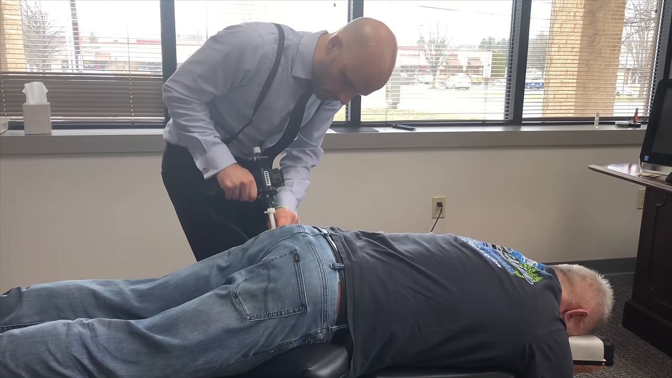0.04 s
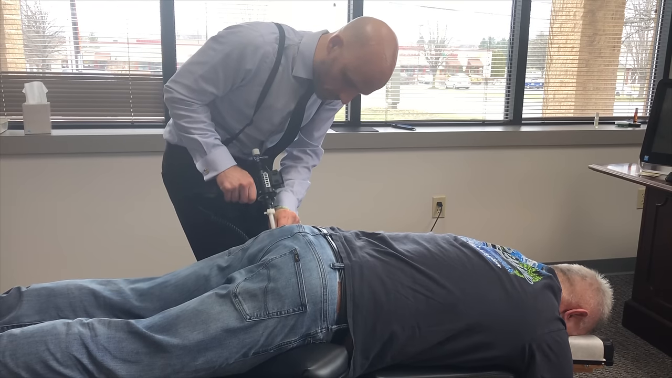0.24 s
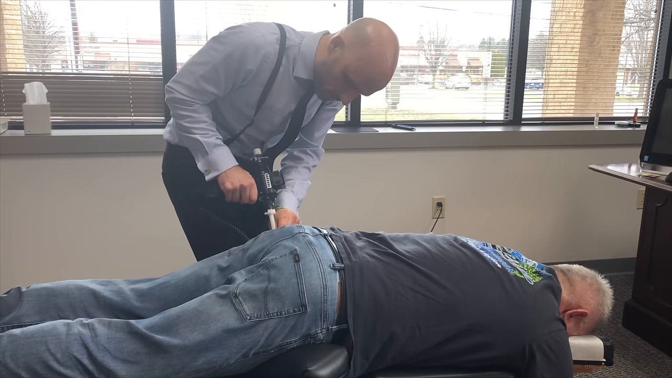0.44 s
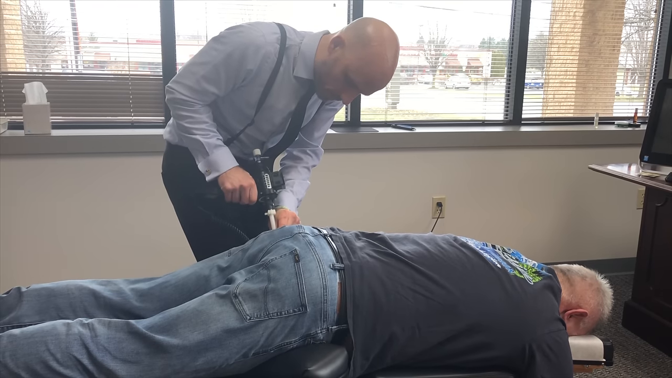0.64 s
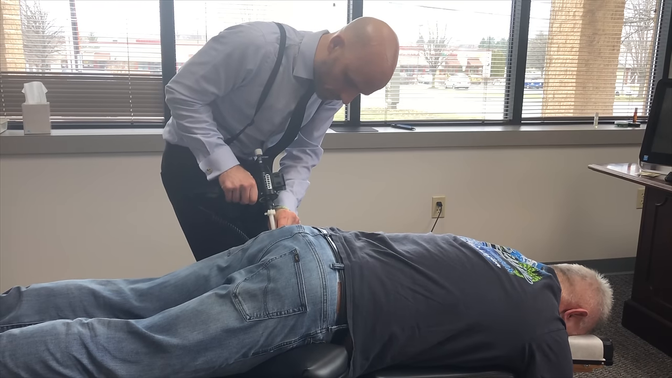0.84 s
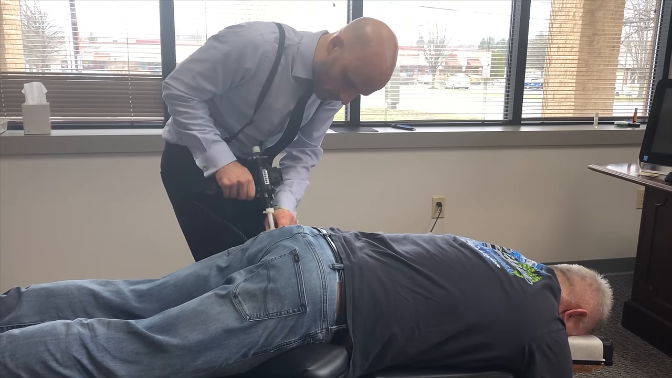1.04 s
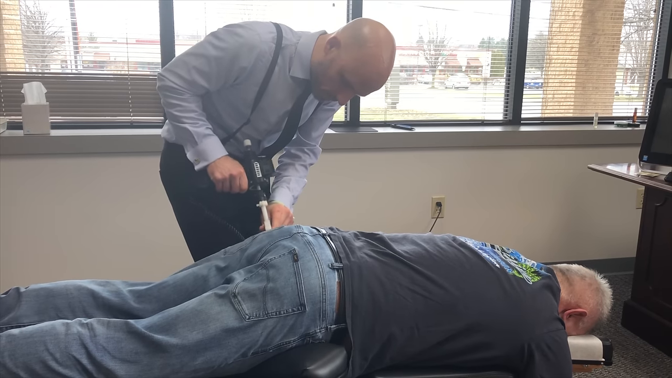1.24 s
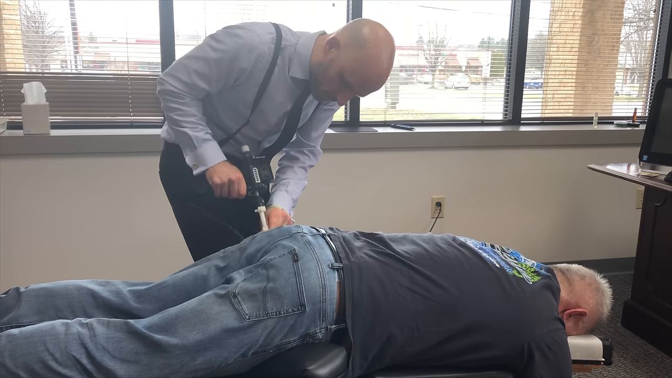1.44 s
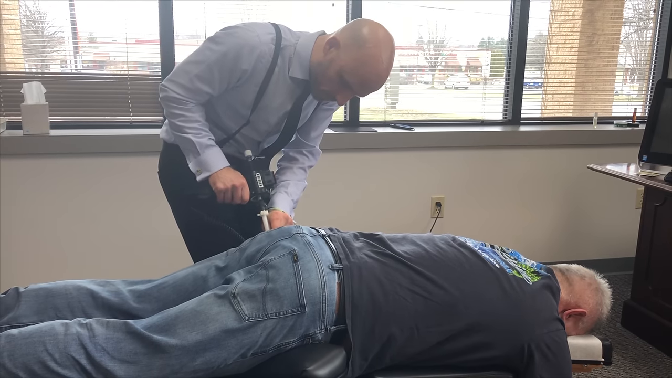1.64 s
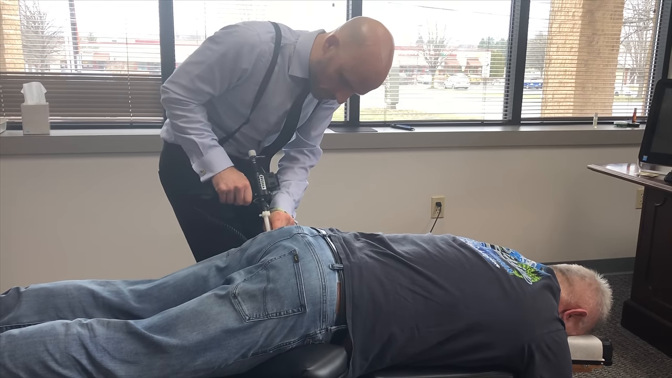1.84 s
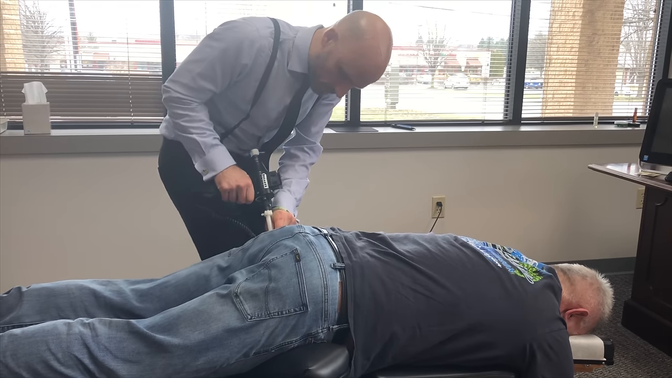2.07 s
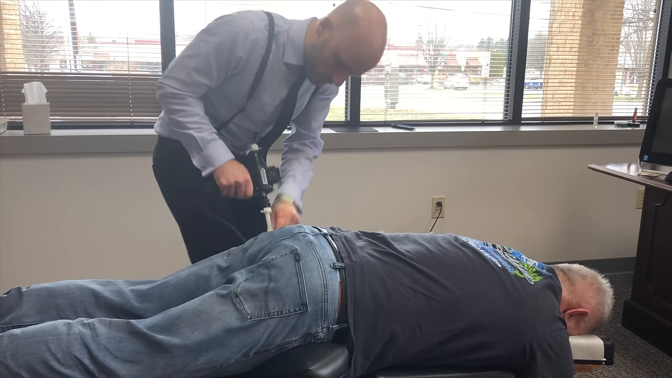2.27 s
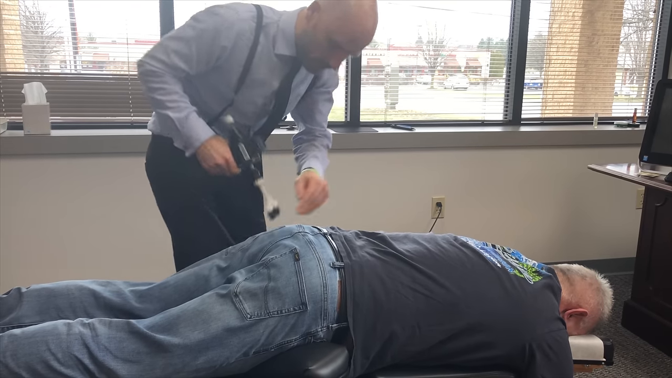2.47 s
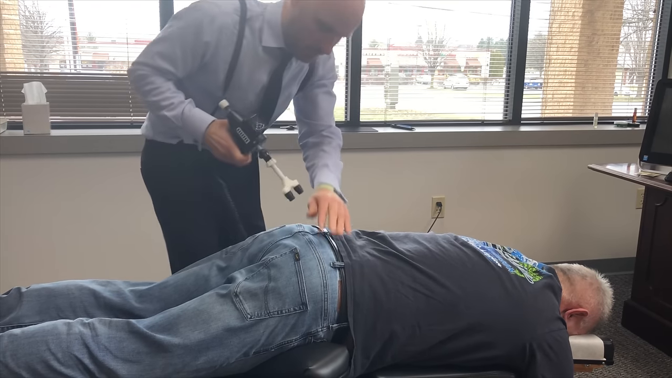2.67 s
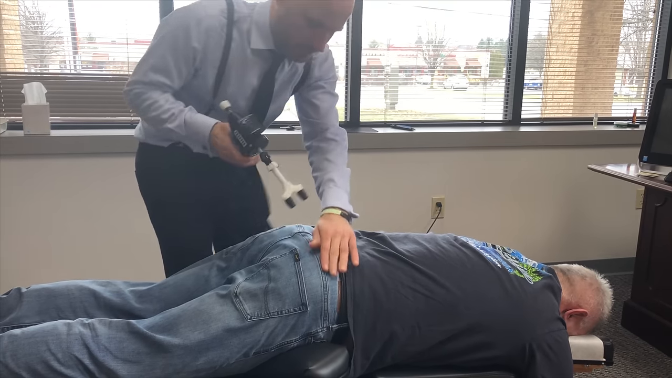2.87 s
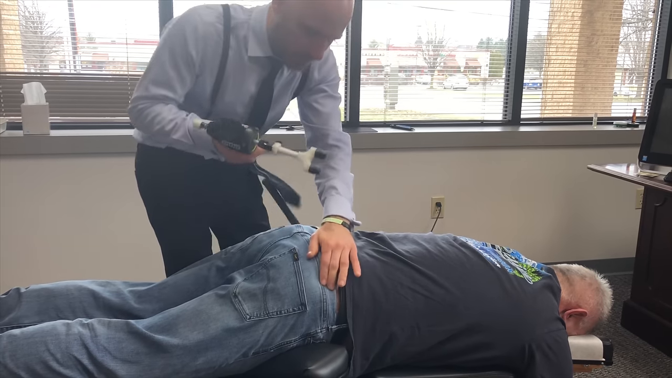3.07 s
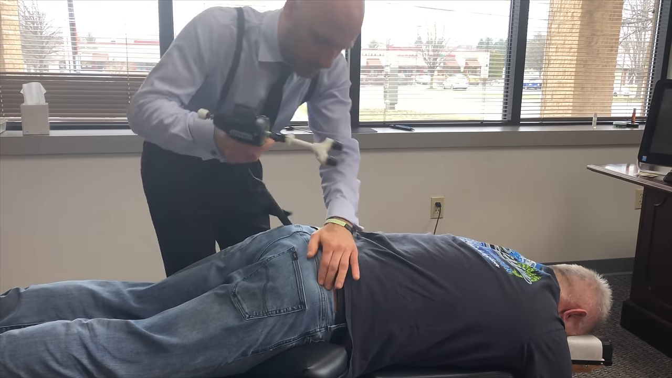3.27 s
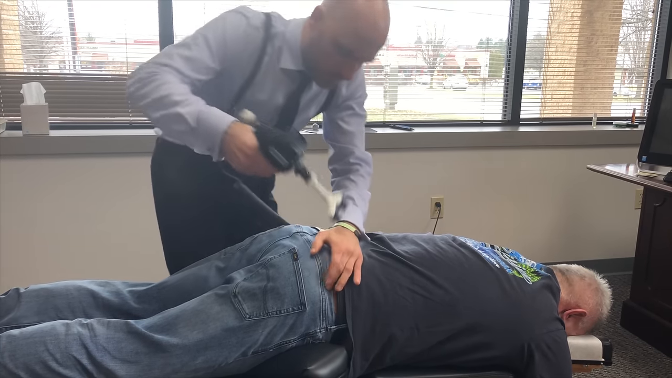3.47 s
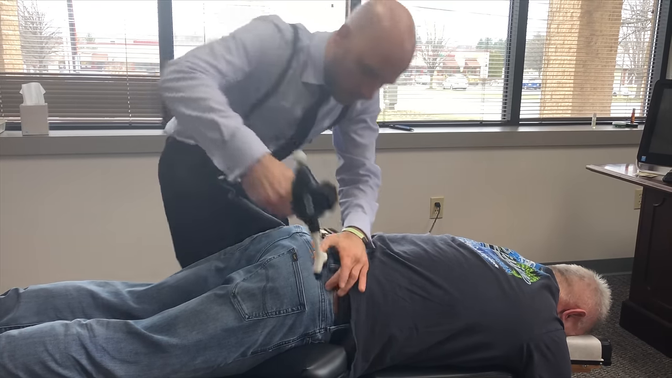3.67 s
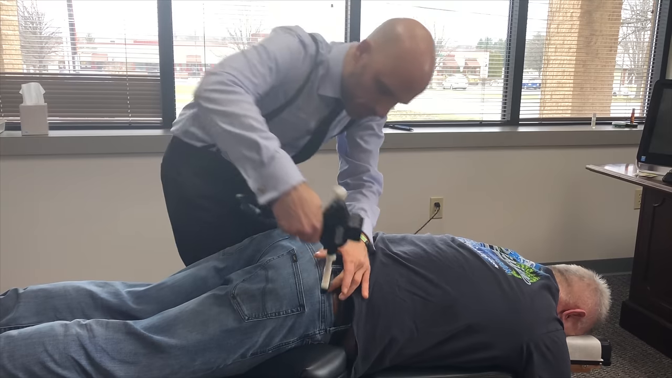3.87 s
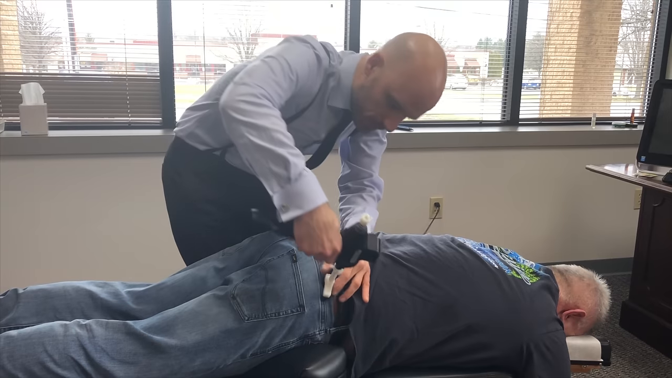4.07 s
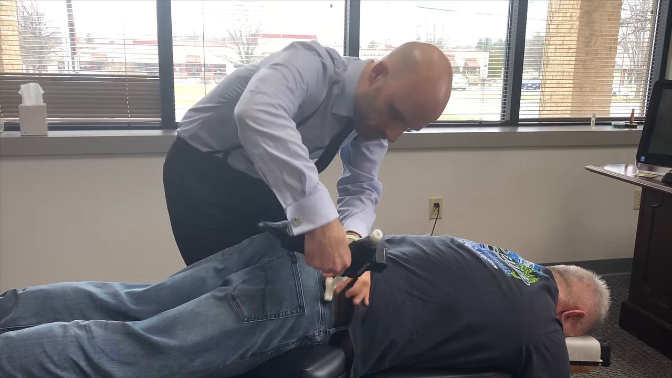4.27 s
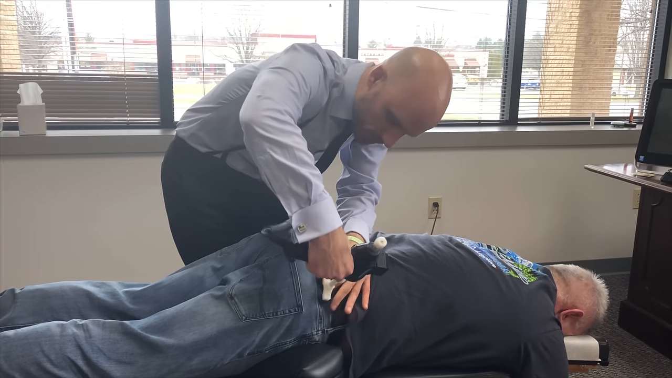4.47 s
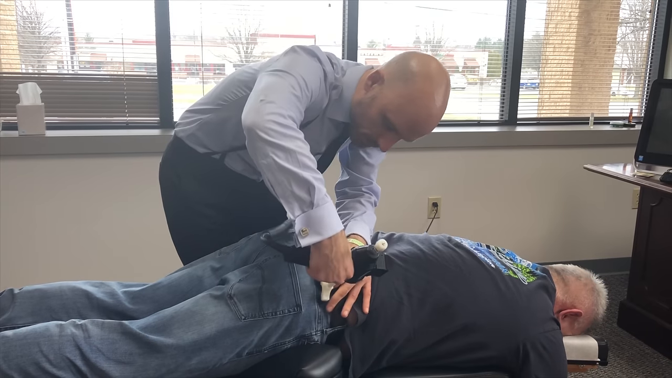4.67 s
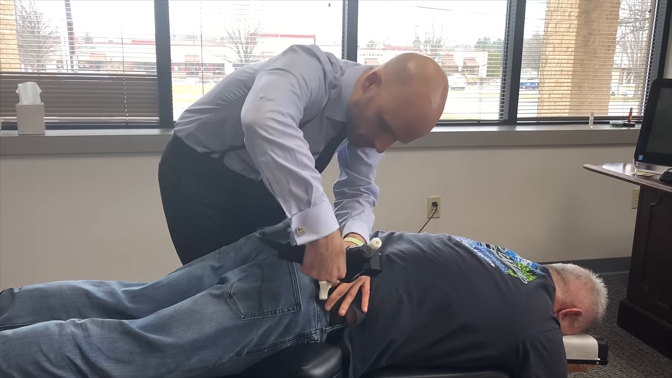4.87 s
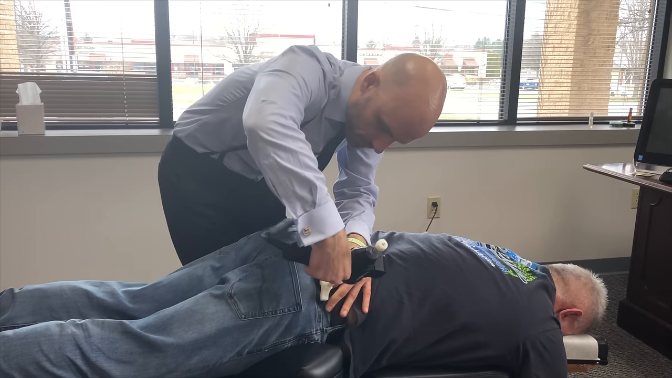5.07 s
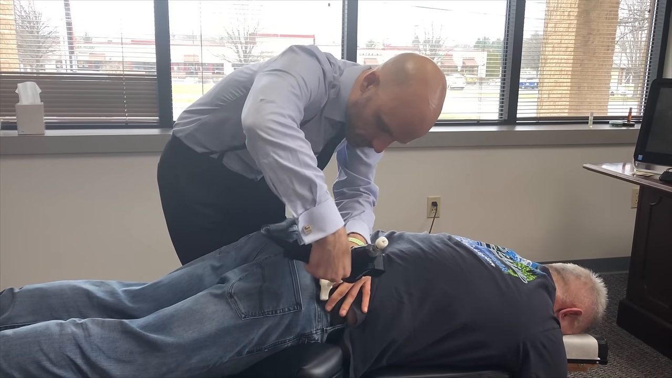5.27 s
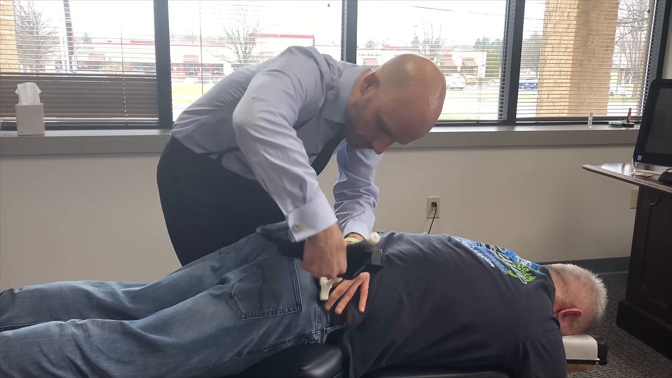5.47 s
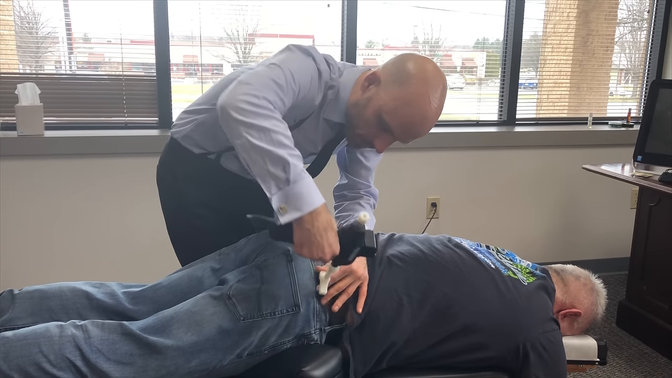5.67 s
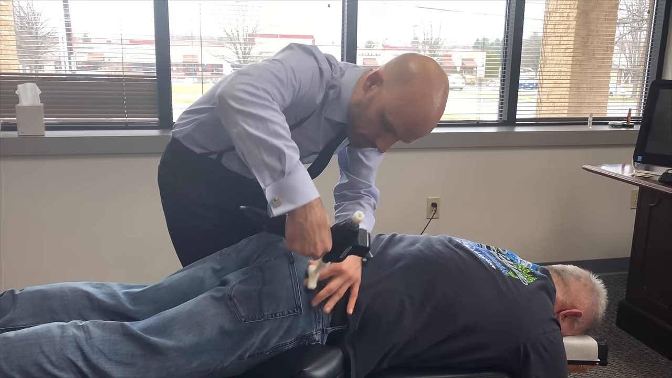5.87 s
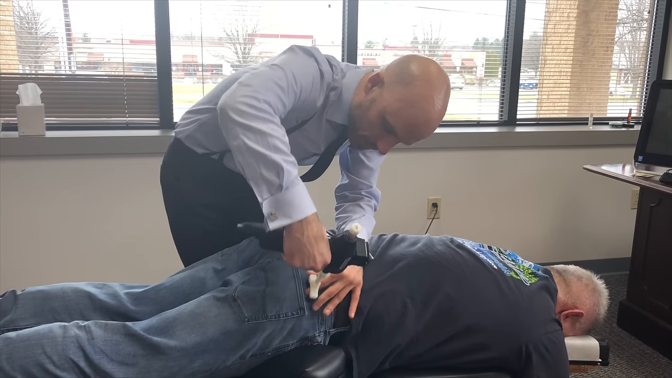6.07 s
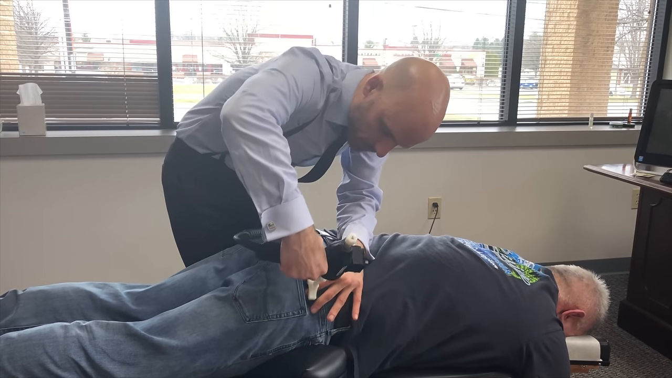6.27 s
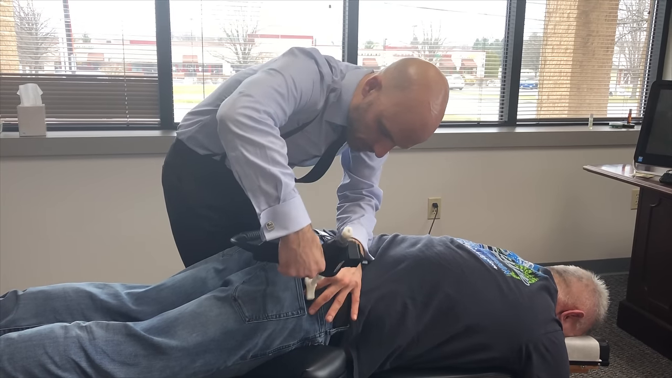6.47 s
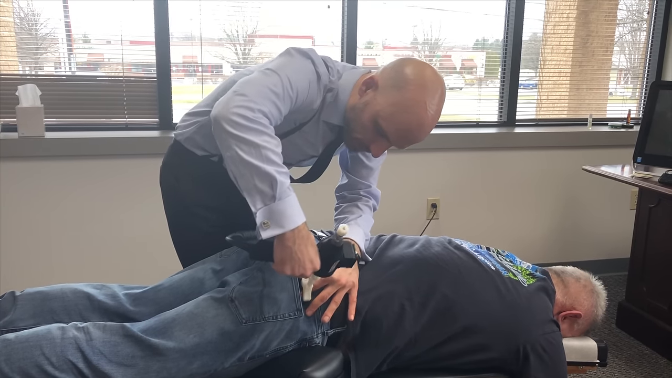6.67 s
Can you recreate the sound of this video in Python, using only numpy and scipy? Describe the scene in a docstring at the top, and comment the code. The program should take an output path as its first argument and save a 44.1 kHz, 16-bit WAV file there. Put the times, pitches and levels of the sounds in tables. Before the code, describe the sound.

A quick machine-like tick-tick-tick, about twelve a second, each a spring rattle, snap and small hollow ring, with occasional harder clacks. Midway it ceases for over a second of quiet handling: a sharp plastic click, dull soft thumps, brushing fabric. The second burst is stronger, with a run of bright steel hammering, then uneven emphasis. Ventilation rumbles softly throughout; a single microphone hears the small, lively room.

```python
"""A spring-driven adjusting instrument cycles twelve times a second against a person's back, in a small room.
Every cycle ticks: the spring rattles, a catch snaps and a hollow grip rings. When the hammer catches, shaped
noise bursts make steel chatter on steel, and ringing modes make the housing knock. Midway it is lifted and
set down again: clicks, padded bumps and scuffed cloth, then different echoes. Filtered noise makes the
motor's gears and hum, and the ventilation that rumbles throughout. One microphone hears it, cut near 16 kHz."""
import sys
import numpy as np
from scipy import signal
from scipy.fft import rfft, irfft, next_fast_len
from scipy.io import wavfile

SR = 44100
rng = np.random.default_rng(int(sys.argv[2]) if len(sys.argv) > 2 else 0)


def dump(signal):
    """Clip the signal to [-1, 1] and save it as 16-bit WAV at the path in sys.argv[1]."""
    limited = np.clip(np.atleast_2d(signal).T, -1, 1)
    pcm = np.round(limited * 32767).astype(np.int16)
    wavfile.write(sys.argv[1], SR, pcm)


N = 295911
LEAD = SR // 10   # samples kept ahead of time zero, for sounds that begin before it
LENGTH = 4096   # samples in a short sound
CYCLES_PER_S = 12
FIRM_RATTLE_DB = -57   # spring rattle under a firm hand; slack is counted in dB below it

# relative spectrum of the spring's rattle: (frequency [Hz], density [dB])
SPRING_SPECTRUM = [(1500, -24), (3500, 11), (5800, 6.5), (8000, 3), (10000, -2), (13000, -4), (16000, -7)]
# the two holds of the trigger: (first cycle [s], release [s], spring loading time without slack [s],
# and against the rattle: snap [dB], thin zing [dB], gear whirr [dB])
TRIGGER_HOLDS = [(-0.0114, 2.50, .007, 3, 3.8, -3), (3.7351, 6.70, .0042, -1, -9.5, -5.5)]


def from_db(db):
    """Decibels to gain."""
    return 10 ** (np.asarray(db) / 20)


def at_hz(points, hz):
    """Read a table on a log-frequency axis."""
    f, value = np.transpose(points)
    return np.interp(np.log(np.maximum(hz, 1)), np.log(f), value)


def tilted(spectrum, tilt_db):
    """The same spectrum, brighter or duller by so many dB per octave."""
    return [(hz, db + tilt_db * np.log2(hz)) for hz, db in spectrum]


def colour(x, spectrum):
    """Causal (minimum-phase) filter of the given spectrum, with unit gain for white noise."""
    size = next_fast_len((len(x) + LENGTH // 2) // 2, real=True) * 2
    hz = np.arange(size // 2 + 1) * SR / size
    cepstrum = irfft(np.log(from_db(at_hz(spectrum, hz))))
    # folding the cepstrum forward in time gives minimum phase
    cepstrum[1:size // 2] *= 2
    cepstrum[size // 2 + 1:] = 0
    response = np.exp(rfft(cepstrum))
    gain = np.sqrt(np.mean(abs(response) ** 2))
    return irfft(rfft(x, size) * response / gain)[:len(x)]


def sized(x, db):
    """Scale a short sound to the energy of 10 ms at this level."""
    energy = np.sum(x ** 2) + 1e-20
    return x * from_db(db) * np.sqrt(SR / 10 ** 2 / energy)


def add(track, s, sound):
    """Mix a short sound into a track at this time in seconds."""
    start = max(round(s * SR) + LEAD, 0)
    part = track[start:start + len(sound)]
    part += sound[:len(part)]


def chatter(rise_s, decay_s):
    """A flurry of tiny contacts that swells and dies within milliseconds, its spectrum partly evened out."""
    t = np.arange(LENGTH) / SR
    swell = (1 - np.exp(-t / rise_s)) ** 2 * np.exp(-t / decay_s)
    flurry = rng.standard_normal(LENGTH) * swell
    span = np.minimum(6 * swell / swell.max(), 1)
    for _ in range(3):
        spectrum = rfft(flurry)
        # exponent: 0 = lumpy spectrum, 1 = flat
        flurry = span * irfft(spectrum / (abs(spectrum) + 1e-12) ** 0.81)
    return flurry


def struck(modes, spread_db, rough, contact_s, detune=0):
    """One blow and its after-contacts ring decaying modes, whose strengths and pitches vary at random."""
    t = np.arange(LENGTH) / SR
    hz, db, t60 = np.transpose(modes)[:, :, None]
    hz = hz * np.exp(detune * rng.standard_normal(hz.shape))
    strength = from_db(db + spread_db * rng.standard_normal(hz.shape))
    strength = strength * rng.choice([-1, 1], hz.shape)
    ring = np.sum(strength * from_db(-60 * t / t60) * np.sin(2 * np.pi * hz * t), axis=0)
    force = chatter(contact_s / 10, contact_s)
    force *= rough / np.linalg.norm(force)
    force[0] += 1   # the blow itself
    return signal.fftconvolve(force, ring)[:LENGTH]


def effort(s):
    """Levels of catch, grip and spring rattle at these times, as the hand leans on the instrument and eases off."""
    # (time [s], catch [dB], hollow grip [dB], spring rattle [dB])
    hand_levels = [(.15, -54.3, -52.8, -62), (1.08, -52, -53, -60.5), (1.24, -58.5, -59.5, -70),
                   (1.49, -58, -59, -74), (1.75, -53.5, -51.5, -63.5), (2.33, -53.3, -52, -65),
                   (2.49, -57, -57, -76), (3.73, -51, -50.5, -65), (4.05, -50.5, -57, -73),
                   (4.75, -49, -49.5, -58.5), (5.1, -45.5, -41.7, -52), (5.5, -48.5, -45.5, -56.5),
                   (5.85, -49.5, -53.5, -69), (5.99, -51.5, -55, -74), (6.15, -46.5, -51, -55),
                   (6.48, -48, -50, -57), (6.66, -45.5, -49, -53)]
    when, *columns = np.transpose(hand_levels)
    return [np.interp(s, when, column) for column in columns]


def ventilation():
    """Air from the vents is filtered noise, its low rumble wandering in level."""
    # relative spectrum: (frequency [Hz], density [dB])
    air_spectrum = [(20, -42), (32, -29), (45, -5.5), (62, 0), (115, 1.5), (190, -3.5), (250, -6.5),
                    (350, -15.5), (550, -17), (900, -26.5), (2000, -34.5), (4000, -36), (8000, -42.5),
                    (16000, -45)]
    # low rumble over the usual: (time [s], level [dB])
    rumble_level = [(0, -1.5), (.9, 2), (1.4, 0), (2.15, 1.5), (2.5, -1), (4.2, -1.3), (6.7, -.5)]
    air = from_db(-50.5) * colour(rng.standard_normal(N + LEAD), air_spectrum)[LEAD:]
    rumble = signal.sosfiltfilt(signal.butter(2, 260, fs=SR, output="sos"), air)
    rumble_db = np.interp(np.arange(N) / SR, *np.transpose(rumble_level))
    return air + rumble * (from_db(rumble_db) - 1)


def handling():
    """Plastic parts click in the hand, padded bumps give a short dull note, sleeves and fingers scuff the cloth."""
    # clicks as the instrument shifts in the hand: (time [s], level [dB], brightness [dB per octave])
    clicks = [(2.377, -55.5, 6), (2.464, -55, 19), (2.5815, -37, -1.5), (2.593, -41.5, 1),
              (2.960, -58, -1.5), (3.155, -70, 10), (3.649, -62, 15), (3.733, -55, -3)]
    # soft bumps of hand and instrument on the body: (time [s], base level [dB], pitch [Hz])
    bumps = [(2.523, -45.5, 194), (2.637, -47.7, 386), (3.338, -52, 298)]
    # sleeves and fingers brushing over cloth: (start [s], length [s], base level [dB], centre [Hz])
    scuffs = [(2.35, .2, -62, 1100), (2.6, 1.0, -71, 1500), (3.331, 0.1, -60, 760),
              (3.434, 0.036, -65, 1700), (3.561, 0.065, -60, 2200), (3.7, .25, -63.5, 1100),
              (3.72, .2, -68, 7000)]
    # relative spectrum of plastic: (frequency [Hz], density [dB])
    plastic = [(300, -36), (900, -14), (1600, -3), (2200, -3.5), (3200, 0), (4500, -5), (7000, -8),
               (10000, -14.5), (16000, -24)]
    # relative spectrum of a scuff: (multiple of its centre [ratio], density [dB])
    fabric = [(.22, -12), (.65, -3), (1, 0), (1.4, -4), (3, -16), (8, -22), (16, -30)]
    out = np.zeros(N + LEAD)
    for s, db, tilt_db in clicks:
        click = colour(chatter(rise_s=0.00028, decay_s=0.0029), tilted(plastic, tilt_db))
        add(out, s, sized(click, db))
    for s, db, hz in bumps:
        note = struck([(hz, 0, .055)], spread_db=0, rough=0.84, contact_s=0.0024)
        add(out, s, sized(note, db + 3.0))
        puff_spectrum = [(hz / 2, -5), (hz, 0), (750, -4), (1400, -19), (5000, -42)]
        puff = colour(chatter(rise_s=0.00078, decay_s=0.011), puff_spectrum)
        add(out, s, sized(puff, db))
    for s, length_s, db, hz in scuffs:
        spectrum = [(hz * multiple, level) for multiple, level in fabric]
        fibres = colour(rng.standard_normal(SR + LEAD), spectrum)
        stroke = np.sin(np.pi * np.minimum(np.arange(len(fibres)) / SR / length_s, 1))
        add(out, s, from_db(db - 1.5) * fibres * stroke)
    return out


def drive():
    """While the trigger is held, gears whirr with the load over a wavering hum and whine as they wind the spring."""
    # relative spectra of whirr, winding whine and motor hum: (frequency [Hz], density [dB])
    gears = [(400, -16), (900, -2), (1250, 6.5), (1900, -5), (2400, -13), (2750, 0), (3200, -2), (4600, -5),
             (5600, -3), (6500, -20), (16000, -41)]
    winding_whine = [(1500, -40), (2500, -16), (2750, 4), (3000, -21), (5000, -47)]
    motor_hum = [(100, -32.5), (155, -11.5), (168, -1.5), (181, -17), (300, -33), (1000, -69)]
    # motor hum: (time [s], level [dB])
    hum_level = [(0, -67), (.6, -56), (1.1, -53), (1.35, -66), (1.85, -60), (3.8, -59), (4.7, -64),
                 (5.35, -51), (6.7, -66)]
    spin_s = .08   # the motor's time to start or stop
    whirr_loss_db = .92   # per dB of slack
    t = np.arange(N) / SR
    whine = from_db(-3.3) * colour(rng.standard_normal(N), winding_whine)
    whirr = from_db(-3.0) * colour(rng.standard_normal(N), gears)
    hum = colour(rng.standard_normal(N + LEAD), motor_hum)[LEAD:]
    hum = hum * from_db(np.interp(t, *np.transpose(hum_level)))
    slack_db = FIRM_RATTLE_DB - effort(t)[2]
    out = np.zeros(N)
    for first_s, release_s, *_, whirr_db in TRIGGER_HOLDS:
        running = np.clip(np.minimum(t - first_s, release_s - t) / spin_s + 1, 0, 1)
        since = (t - first_s) % (1 / CYCLES_PER_S)
        winding = np.exp(-((since - .056) / .009) ** 2)   # centred 56 ms into each cycle
        load = from_db(FIRM_RATTLE_DB + whirr_db - whirr_loss_db * slack_db)
        out += running * (load * (whirr + winding * whine) + hum)
    return out


def ticks():
    """On every cycle the spring rattles as it loads, then the catch snaps, the grip rings and the catch settles."""
    # modes of the catch and the hollow grip: (centre frequency [Hz], mean level [dB], t60 [s])
    catch = [(1860, -6.5, 0.0056), (2220, -4, 0.0054), (2563, 3.3, .006), (2807, -1.5, 0.0072),
             (3210, -1.5, 0.0054), (3780, -9.5, 0.0032), (4500, -10.5, 0.0029), (5540, -11.5, 0.0071)]
    grip = [(1020, -9, 0.015), (1242, -0.5, 0.014), (1374, -3, 0.011), (1570, 3, 0.0064),
            (1780, -6.5, 0.018)]
    # relative spectrum of the spring's thin zing: (frequency [Hz], density [dB])
    zing_spectrum = [(5000, -29), (10000, -12), (13000, -6), (14500, 4), (16000, -2)]
    firm_grip_db, drag_s_per_db = -51, .0002   # leaning on the instrument delays the catch
    brighter_db_per_db = .22   # a slacker spring rattles duller, per octave
    loading_loss_db, shorter_per_db = .25, .014   # per dB of slack it loads more quietly and sooner done
    out = np.zeros(N + LEAD)
    for first_s, release_s, loading_s, snap_db, zing_db, _ in TRIGGER_HOLDS:
        for beat in np.arange(first_s, release_s, 1 / CYCLES_PER_S):
            tick_db, body_db, rattle_db = effort(beat)
            slack_db = FIRM_RATTLE_DB - rattle_db
            s = beat + drag_s_per_db * (body_db - firm_grip_db)
            loads = s - loading_s * (1 - shorter_per_db * slack_db)
            load_db = -loading_loss_db * slack_db
            spring = tilted(SPRING_SPECTRUM, -brighter_db_per_db * slack_db - .8)

            zing = colour(chatter(rise_s=0.00029, decay_s=0.0043), zing_spectrum)
            add(out, loads, sized(zing, rattle_db + zing_db + 2 * load_db))
            rattle = colour(chatter(rise_s=0.00036, decay_s=0.0037), spring)
            add(out, loads, sized(rattle, rattle_db - 1.5))
            loading = struck(catch, spread_db=1.0, rough=1.76, contact_s=.0027, detune=0.045)
            add(out, loads + 0.001025, sized(loading, tick_db - 1 + load_db))

            snap = colour(chatter(rise_s=.0001, decay_s=0.00084), spring)
            add(out, s, sized(snap, rattle_db + snap_db))
            tick = struck(catch, spread_db=1.4, rough=0.32, contact_s=0.0011, detune=.02)
            add(out, s, sized(tick, tick_db + .5))
            body = struck(grip, spread_db=1.4, rough=0.6, contact_s=0.0016, detune=0.025)
            add(out, s, sized(body, body_db))

            settles = s + .7 * (s - loads) * rng.uniform(0.97, 1.2)
            settling = colour(chatter(rise_s=.0001, decay_s=0.00099), spring)
            add(out, settles, sized(settling, rattle_db - 1.0))
    return out


def strikes():
    """The hammer slides in and chatters on the plunger, the housing cracks and rings, the tip thumps and rebounds."""
    # cycles on which the hammer catches: (time [s], base strength [dB], base steel chatter [dB])
    blows = [(-0.014, -37.5, -41.5), (0.0686, -40.5, -35), (1.1492, -37.3, -43.5), (1.5666, -40.5, -47),
             (1.6517, -36, -34), (2.3983, -42, -51.5), (4.2313, -39.5, -48.5), (4.315, -34.2, -40.5),
             (4.3985, -32.7, -38.5), (4.4824, -30.2, -31.5), (4.5663, -30.5, -28.5), (4.6506, -32, -29),
             (5.0672, -44, -66), (5.149, -42, -55), (5.2367, -44.5, -68), (5.6489, -30, -33),
             (6.232, -38.5, -48), (6.3159, -32.5, -31), (6.4023, -46, -37.5)]
    # modes of the plunger and the housing: (centre frequency [Hz], mean level [dB], t60 [s])
    plunger = [(721, -11, 0.02), (832, -3.5, 0.057), (925, -6.5, 0.03), (1025, -5, 0.03), (1134, -8, 0.021)]
    housing = [(1202, -1, 0.021), (1390, -8, 0.0067), (1490, -7, 0.012), (1765, -1, 0.038),
               (1880, -7.5, 0.039), (2235, -2.5, 0.028), (2540, -1, 0.014), (3090, -3.5, 0.013),
               (3500, -9, 0.0025), (4320, 0, 0.0017)]
    # relative spectra of steel, the housing's first crack and the thump: (frequency [Hz], density [dB])
    steel_spectrum = [(1500, -38), (3500, -9), (4600, -5), (5400, 1), (6400, -2), (7600, 6), (8700, -3.5),
                      (10500, 5), (11800, -4), (13500, -0.5), (16000, -3.5)]
    crack_spectrum = [(450, -21), (720, -1.5), (1150, 1.5), (1550, -1), (1900, 0), (2900, -3.5),
                      (3700, -11), (4400, -9.5), (7000, -29)]
    thump_spectrum = [(50, -6), (120, -1), (200, 7), (320, 2.5), (520, -3.5), (800, -11), (2000, -16.5)]
    full_stroke_db, graze_loss = -40, 1.8   # weaker blows barely move the plunger: dB of knock lost per dB
    knock_db_per_db = .28   # the knock grows as the blow lands more squarely on steel
    top_hz, top_db_per_db = 9000, 1.1   # cushioned blows lose the top (per octave), square ones gain it
    out = np.zeros(N + LEAD)
    hardest_db = max(row[2] for row in blows)
    for s, clack_db, steel_db in blows:
        square_db = steel_db - clack_db
        graze_db = graze_loss * max(full_stroke_db - clack_db, 0)
        knock_db = clack_db - 7 + knock_db_per_db * square_db - graze_db
        steel = tilted(steel_spectrum, 0.36 * (steel_db - hardest_db))   # weaker blows are duller
        steel = [(hz, db + top_db_per_db * square_db * max(np.log2(hz / top_hz), 0)) for hz, db in steel]

        slide = colour(chatter(rise_s=0.0018, decay_s=0.0013), SPRING_SPECTRUM)
        add(out, s - .003, sized(slide, steel_db - 25))
        contact = colour(chatter(rise_s=0.00044, decay_s=0.00098), steel)
        add(out, s, sized(contact, steel_db + .5))
        rebound = colour(chatter(rise_s=0.00028, decay_s=0.0013), steel)
        add(out, s + .0028, sized(rebound, steel_db - 8.5))

        crack = colour(chatter(rise_s=0.00075, decay_s=0.00209), crack_spectrum)
        add(out, s + .0004, sized(crack, clack_db - 1.2))
        clack = struck(housing, spread_db=.5, rough=0.53, contact_s=0.0019, detune=0.022)
        add(out, s + 0.002205, sized(clack, clack_db - 5.3))
        knock = struck(plunger, spread_db=.8, rough=0.16, contact_s=0.0015, detune=0.0026)
        add(out, s + 0.00155, sized(knock, knock_db + 3.5))
        thump = colour(chatter(rise_s=0.00064, decay_s=0.0086), thump_spectrum)
        add(out, s + .001, sized(thump, knock_db + 1.8))
    return out


def room(x, build_s, wet_db):
    """Dense reflections build up within milliseconds, then each band of echoes dies at its own rate."""
    # (frequency [Hz], t60 [s])
    decay_times = [(150, 0.93), (800, 0.35), (2500, 0.3), (6000, .29), (10000, 0.23), (16000, 0.35)]
    # before the overall wet level: (frequency [Hz], echo level [dB])
    echo_levels = [(150, -2), (900, 4.5), (1500, 3), (3000, -0.5), (6000, -2), (10000, -4.5), (16000, -9.5)]
    t = np.arange(SR // 3) / SR
    edges = np.geomspace(100, 19000, 22)
    echoes = np.zeros(len(t))
    for low, high in zip(edges, edges[1:]):
        hz = np.sqrt(low * high)
        band_pass = signal.butter(2, [low, high], "band", fs=SR, output="sos")
        band = signal.sosfilt(band_pass, rng.standard_normal(len(t)))
        band *= (1 - np.exp(-(t / build_s) ** 2)) * from_db(-60 * t / at_hz(decay_times, hz))
        share = np.sqrt(2 * (high - low) / SR)   # the band's part of the whole spectrum
        echoes += band / np.linalg.norm(band) * share * from_db(at_hz(echo_levels, hz))
    return x + from_db(wet_db) * signal.fftconvolve(x, echoes)[:len(x)]


def scene():
    """Instrument and hands in the room, whose echoes change once the instrument is moved; drive and air beneath."""
    # crossfade over 0.1 s from the first place to the second, starting at 3 s
    moved = np.clip(((np.arange(N + LEAD) - LEAD) / SR - 3.0) * 10, 0, 1)
    blows = strikes()
    small = ticks() + handling()
    first = room(blows * (1 - moved), build_s=0.0022, wet_db=-0.5)
    first += room(small * (1 - moved), build_s=0.001, wet_db=-.5)
    second = room(blows * moved, build_s=0.0038, wet_db=-4)
    second += room(small * moved, build_s=0.0017, wet_db=-1.2)
    return ((first + second)[LEAD:] + drive() + ventilation())[None]


def record(dry):
    """The top is cut steeply above 16 kHz."""
    return signal.sosfilt(signal.ellip(10, .2, 75, 16050, fs=SR, output="sos"), dry)


dry = scene()
out = record(dry)
dump(out)
```